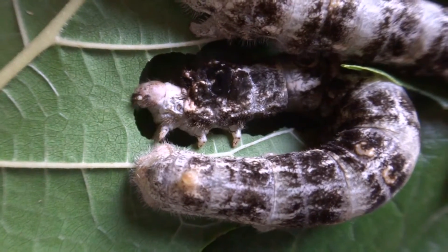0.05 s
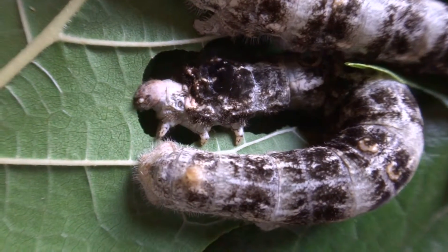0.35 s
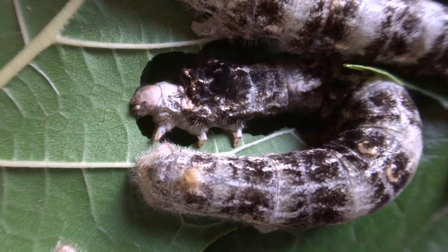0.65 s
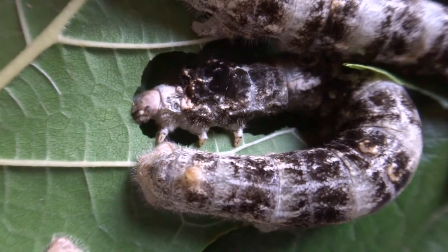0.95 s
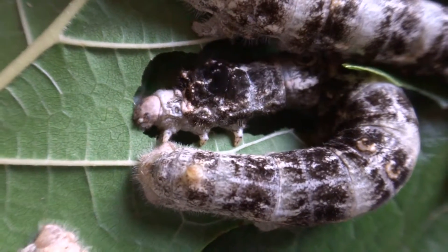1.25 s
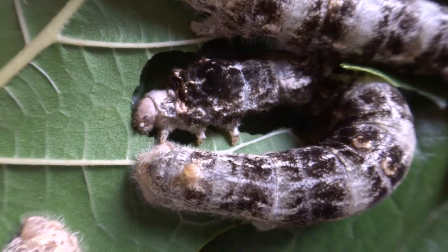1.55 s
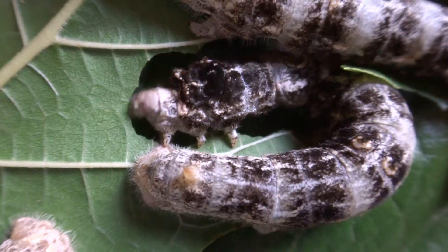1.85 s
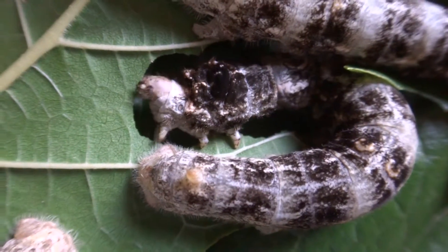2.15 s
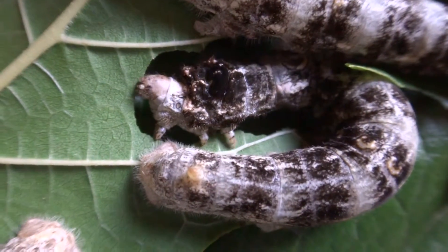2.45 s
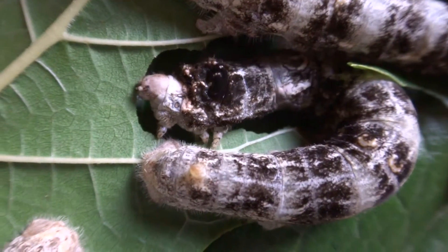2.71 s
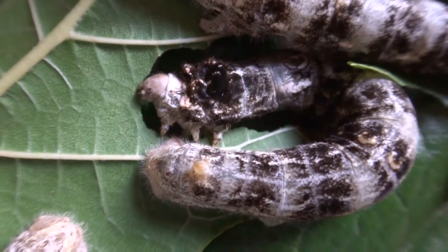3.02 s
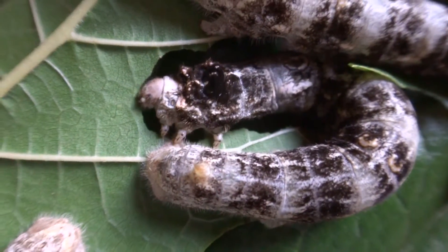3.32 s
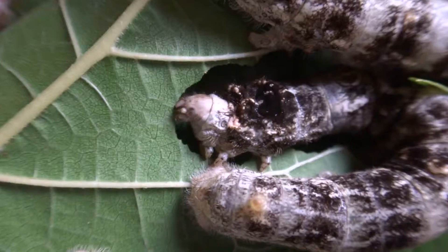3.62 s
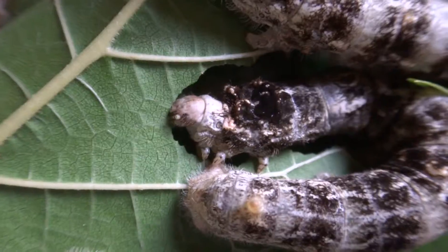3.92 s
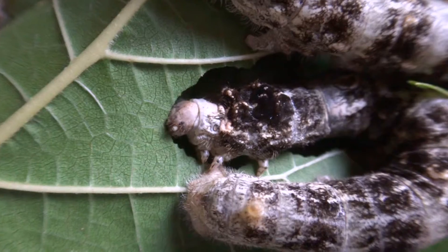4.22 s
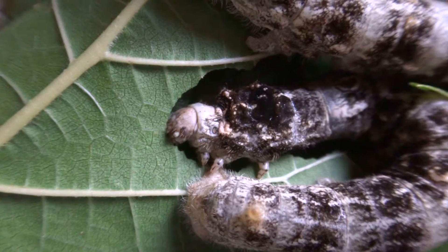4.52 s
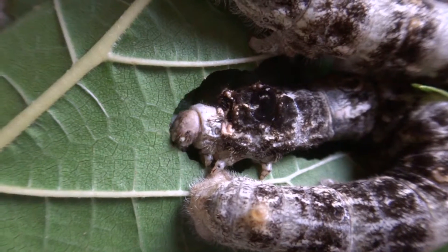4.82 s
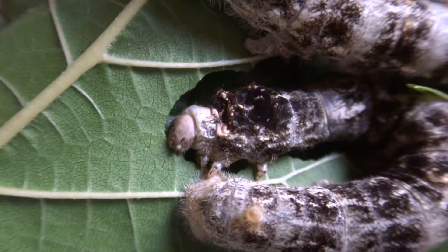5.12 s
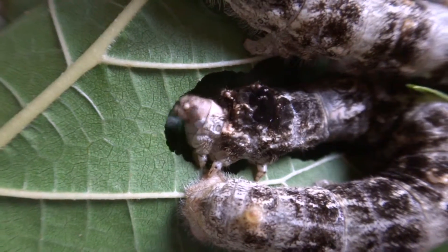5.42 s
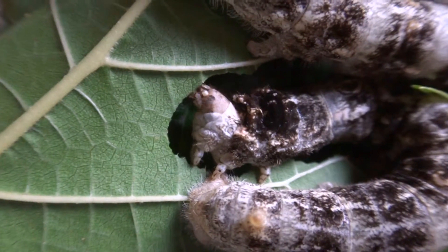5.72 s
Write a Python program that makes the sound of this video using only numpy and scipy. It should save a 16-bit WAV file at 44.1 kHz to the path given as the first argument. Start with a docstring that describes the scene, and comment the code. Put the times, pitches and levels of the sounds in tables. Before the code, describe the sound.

Many silkworms feed on leaves in a quiet room. Right at the microphone their jaws snap through the leaf in sharp, high, irregular ticks, several a second, with an occasional tiny rasping tear. Farther ones blend into a fine crackle. Underneath lie a low room rumble, faint fan hum and a thin camera whirr. A few very soft bumps come around the middle, then the background briefly drops out.

```python
"""A fine crackle comes first: many silkworms feeding on a tray of leaves in a quiet room.
Right at the camera's microphone, mandibles snap through the blade in sharp little ticks and now and then
saw through a row of fibres. Behind them lie room rumble, two beating fans and the camera's own whirr;
its lens motor makes one short run of steps. The tray is bumped softly a few times,
and the steady background dips briefly once."""
import sys
import numpy as np
from scipy import signal
from scipy.fft import rfft, irfft, next_fast_len
from scipy.io import wavfile
from scipy.ndimage import map_coordinates

SR = 44100
rng = np.random.default_rng(int(sys.argv[2]) if len(sys.argv) > 2 else 0)


def unload_wav(signal):
    """Save mono or channel-first audio to the path in sys.argv[1] as 16-bit WAV at rate SR, clipped to [-1, 1]."""
    wavfile.write(
        sys.argv[1],
        SR,
        np.round(np.clip(np.atleast_2d(signal).T, -1, 1) * 32767).astype(np.int16),
    )


N = 258426


def amp(db):
    return 10 ** (np.asarray(db) / 20)


def unit(x):
    """Scaled to rms 1."""
    return x / np.sqrt(np.mean(x ** 2) + 1e-20)


def along(points, hz):
    """(f/Hz, value) points joined on a log axis."""
    f, v = np.transpose(points)
    return np.interp(np.log(hz + 1), np.log(f + 1), v)


def curve(rows):
    """(t/s, value) rows as one value per sample."""
    return np.interp(np.arange(N) / SR, *np.transpose(rows))


def wobble(rate):
    """A smooth random curve, rate knots a second."""
    knots = rng.standard_normal(int(N * rate / SR) + 4)
    return map_coordinates(knots, [np.arange(N) * rate / SR])


def filtered(x, response):
    """x shaped by a frequency response."""
    size = next_fast_len(N + SR // 4)
    return irfft(rfft(x, size) * response(np.fft.rfftfreq(size, 1 / SR)), size)[..., :N]


def causal(gain):
    """The response with this gain that rings only after its cause."""
    cepstrum = irfft(np.log(np.maximum(gain, 1e-6)))
    half = len(cepstrum) // 2
    cepstrum[1:half] *= 2
    cepstrum[half + 1:] = 0
    return np.exp(rfft(cepstrum))


def bell(hz, centre, width):
    """A rounded peak of height 1."""
    return np.exp(-2 * ((hz - centre) / width) ** 2)


def octave_bell(hz, centre, octaves):
    """The same peak on an octave axis."""
    return bell(np.log2(hz + 1), np.log2(centre), octaves)


def band_gain(bands, hz):
    """The gain of (f/Hz, width/Hz, gain/dB) lifts and cuts."""
    return amp(sum(db * bell(hz, centre, width) for centre, width, db in bands))


def pan(db):
    """Stereo gains, left louder than right by db."""
    return amp(np.array([[db], [-db]]) / 2)


def stereo(mid, side):
    return np.array([mid + side, mid - side])


def stereo_noise(side_db):
    """White noise, its side signal side_db against its mid."""
    mid, side = rng.standard_normal((2, N))
    return unit(stereo(mid, amp(side_db) * side))


def add(out, s, sound):
    """Mixes a sound in at time s."""
    start = max(0, round(s * SR))
    span = out[:, start:start + sound.shape[-1]]
    span += sound[..., :span.shape[-1]]


def crackle(rate, spread_db, clump_db, t60, size=400):
    """Tiny fractures: decaying noise grains of random strength, clumping around a base rate a second."""
    chance, strength = rng.random(N), np.minimum(rng.exponential(1, N), 3)
    starts = chance < rate / SR * amp(clump_db * wobble(25))
    impulses = starts * amp(spread_db * strength)
    decay = amp(-60 * np.arange(size) / SR / t60)
    power = signal.fftconvolve(impulses ** 2, decay ** 2)[:N]
    return unit(np.sqrt(np.abs(power)) * stereo_noise(side_db=-9))


# Colour of the chewing farther back on the tray: f/Hz, relative level/dB
CROWD_COLOUR = [(1200, -38), (2500, -20), (3400, -2), (4500, -3.5), (6000, 0.5), (8000, 1), (9500, -0.5),
                (11500, -6), (15000, -17)]
# How busily that crowd feeds: t/s, level/dB before the background gain
CROWD_ACTIVITY = [(0.0, -51.5), (0.9, -50.5), (1.16, -51.5), (1.48, -48.5), (2.06, -48.5), (2.43, -54.5),
                  (2.84, -51), (3.25, -51), (3.61, -49), (4.29, -47.5), (4.85, -47), (5.29, -50),
                  (5.86, -46)]
def crowd(crackle_db=-3, hiss_db=-7, patch_db=7, waver_db=1.2, patches=5):
    """Farther mouths, each group on a patch of leaf with its own ring; the farthest blur into hiss."""
    grains = np.zeros((2, N))
    for ring_hz in np.geomspace(3600, 9500, patches):
        colour_db = lambda hz: along(CROWD_COLOUR, hz) + patch_db * bell(hz, ring_hz, 0.31 * ring_hz)
        chewing = crackle(rate=89, spread_db=5, clump_db=4, t60=0.0084)
        grains += filtered(chewing, lambda hz: causal(amp(colour_db(hz))))
    hiss = filtered(stereo_noise(side_db=-14.5), lambda hz: amp(along(CROWD_COLOUR, hz)))
    activity = amp(curve(CROWD_ACTIVITY) + waver_db * wobble(14))
    return activity * (amp(crackle_db) * unit(grains) + amp(hiss_db) * unit(hiss)) * pan(-1)


# Room tone at the microphone: f/Hz, relative level/dB
ROOM_COLOUR = [(20, 0.5), (60, -1), (85, -0.5), (140, -0.5), (250, -5), (500, -8), (1000, -13.5),
               (1700, -15), (4000, -18.5), (9000, -12), (15000, -10.5)]
# How alike it is in the two channels: f/Hz, correlation
ROOM_LIKENESS = [(40, 1), (130, 0.69), (300, 0.021), (1000, 0.022), (3000, 0.1), (12000, 1)]
def room_tone(level_db=-54.5):
    """Low room rumble and microphone hiss, wide in the midrange and centred at both ends."""
    def mid_side_gains(hz):
        angle = np.arccos(np.clip(along(ROOM_LIKENESS, hz), -1, 1)) / 2
        return amp(along(ROOM_COLOUR, hz)) * [np.cos(angle), np.sin(angle)]
    mid, side = filtered(rng.standard_normal((2, N)), mid_side_gains)
    return amp(level_db) * unit(stereo(mid, side))


# Resonances of the camera case, right beside the microphone:
# f/Hz, width/Hz, level/dB before the background gain, left over right/dB
CASE_RESONANCES = [(720, 148, -67, 56), (1275, 110, -63, 3.5), (2260, 320, -65, 4), (2904, 174, -57, 0.5),
                   (3198, 310, -59, -1.5), (5870, 810, -59.5, -2.5)]
def camera_whirr():
    """Motor noise rings in narrow resonances of the case, nearer one microphone port or the other."""
    out = np.zeros((2, N))
    for centre, width, db, balance_db in CASE_RESONANCES:
        resonance = lambda hz: 1 / (1 + (1.38 * (hz - centre) / width) ** 2)
        band = filtered(stereo_noise(side_db=-6), resonance)
        out += amp(db) * unit(band * pan(balance_db))
    return out


def fan_hum(fan_hz=(111.1, 113.68), fan_db=(-72, -68), swell_s=(1.32, 4.22), mains_hz=100, mains_db=-73):
    """Back in the room, two fans at nearly the same speed beat over a faint mains hum."""
    t = np.arange(N) / SR
    dip_s, _ = min(BACKGROUND_GAIN, key=lambda row: row[1])
    since_swell = t - np.where(t < dip_s, *swell_s)  # in phase at these times, either side of the dip
    fans = sum(amp(db) * unit(np.cos(2 * np.pi * hz * since_swell)) for hz, db in zip(fan_hz, fan_db))
    mains = amp(mains_db) * unit(np.sin(2 * np.pi * mains_hz * t))
    return fans + mains


# Small nibbles near the microphone: mean, spread; rows are level/dB, ring f/Hz, knock/dB, sparkle/dB
NIBBLE_RANGES = [(-34, 2.3), (6700, 900), (-21, 2.5), (-10, 4.4)]
def nibbles(slot_s=0.19):
    """Rows for snap(): one light nibble at a random moment in each slot, ducking with the dip."""
    slots = np.arange(0, N / SR - slot_s, slot_s)
    delays, scatter = rng.random(200), rng.standard_normal((200, 4))
    mean, spread = np.transpose(NIBBLE_RANGES)
    dip_db = curve(BACKGROUND_GAIN) - BACKGROUND_GAIN[0][1]
    rows = []
    for slot, delay, deviation in zip(slots, delays, scatter):
        s = slot + delay * slot_s
        db, *colour = mean + spread * deviation
        rows.append((s, db + dip_db[int(s * SR)], *colour))
    return rows


# Resonances of the leaf closest to the microphone: f/Hz, width/Hz, gain/dB
LEAF_RESONANCES = [(5900, 190, 5.5), (8470, 1300, 5.5), (6900, 500, 1.5), (13700, 970, -4)]
def snap(ring_hz, knock_db, sparkle_db, crack_t60=0.0014, shiver_t60=0.015, gap_s=0.0005, size=1024):
    """A mandible cuts the blade: two fractures a moment apart, then a short shiver of the leaf."""
    t, hz = np.arange(size) / SR, np.fft.rfftfreq(size, 1 / SR)
    since_second = t - gap_s * rng.uniform(0.65, 1.3)
    first = amp(-60 * t / crack_t60)
    second = (since_second > 0) * amp(-1 - 60 * np.abs(since_second) / crack_t60)
    shiver = amp(-11 - 60 * t / shiver_t60)
    envelope = first + second + shiver
    leaf = band_gain(LEAF_RESONANCES, hz)
    broadband = amp(-24) * hz ** 2 / (hz ** 2 + 1500 ** 2)  # so small a source radiates almost no bass
    ring = unit(leaf * octave_bell(hz, ring_hz, octaves=1)) + broadband
    knock = unit(octave_bell(hz, 2250, octaves=0.6))
    sparkle = unit(leaf * bell(hz, 13000, width=5100))
    mid, side = np.zeros((2, size))
    for colour, db in [(ring, 0), (knock, knock_db), (sparkle, sparkle_db)]:
        burst = envelope * rng.standard_normal((2, size))
        part_mid, part_side = irfft(rfft(burst) * causal(colour + amp(-71)))
        mid += amp(db) * unit(part_mid)
        side += amp(db) * unit(part_side)
    tick = stereo(mid, amp(-12) * side)
    return tick * np.sqrt(2 * SR / 1000 / np.sum(tick ** 2))  # the energy of one millisecond at rms 1


# Bites right in front of the microphone:
# t/s, level/dB, ring f/Hz, leaf knock/dB and edge sparkle/dB (both against the ring)
CLOSE_BITES = [(0.2913, -25, 6040, -17, -5), (0.445, -26, 6900, -33, -12.5), (0.7132, -24, 5850, -22, -5),
               (0.8116, -29.5, 6250, -25, -22), (0.8575, -24, 5660, -19, -3), (1.284, -29, 6860, -28, -15),
               (1.429, -28.5, 6300, -16.5, -17), (1.681, -20, 6300, -16, -11), (1.7211, -26, 9100, -31, -2),
               (1.82, -20, 7800, -32, -13), (2.2008, -28.5, 5100, -17, -16),
               (2.2704, -30.5, 6850, -13, -19), (2.3105, -15.5, 6650, -18, -8),
               (2.4727, -26, 6200, -20, -14), (2.4822, -30, 6900, -22, -7), (2.496, -28, 5900, -19, -3),
               (2.6393, -25.5, 7140, -16, -3.5), (2.8937, -26.5, 7000, -21, -9),
               (2.9226, -22, 4050, -17.5, -1.5), (3.021, -30, 7000, -12, 4), (3.24, -23, 6000, -29, -10),
               (3.2638, -24.5, 6230, -20, -12), (3.2717, -30.5, 6700, 11, -10),
               (3.3922, -18, 6130, -19, -19), (3.5842, -35.5, 5800, -8, -23),
               (3.704, -27, 6500, -13.5, -16), (3.9136, -28.5, 7500, -19, -6),
               (4.081, -18.5, 7800, -19, -8), (4.1108, -25, 7400, -17, -3), (4.1937, -21, 7160, -10.5, -2),
               (4.4631, -24.5, 7350, -18, -3), (4.4904, -27, 7000, -25, -10), (4.785, -27, 7060, -21, -15),
               (4.8602, -30.5, 7400, -18, -21), (5.104, -25, 8450, -17, -17), (5.295, -23, 8500, -23, -5),
               (5.538, -26.5, 6540, -22.5, 4), (5.6069, -29.5, 5630, -12, -9),
               (5.7559, -18.5, 5370, -9.5, -10)]
def bites(flank_chance=0.35, flank_s=0.007, flank_db=-11):
    """Close jaws snap among the nibbles; a bite may have a weaker crack just before or after it."""
    flanks = []
    for s, db, *colour in CLOSE_BITES:
        for direction in (-1, 1):
            luck, spacing = rng.random(2)
            if luck < flank_chance:
                flanks.append((s + direction * flank_s * (0.5 + spacing), db + flank_db, *colour))
    out = np.zeros((2, N))
    for s, db, *colour in [*CLOSE_BITES, *flanks, *nibbles()]:
        add(out, s, amp(db) * snap(*colour) * pan(rng.normal(-1, 1)))
    return out


def lens_motor(start_s=0.2745, steps=9, step_hz=60, level_db=-47.5, ring_t60=0.024, tick_t60=0.0066):
    """Beside the microphone, an even run of steps; each ticks at its own strength and rings the barrel."""
    t = np.arange(N) / SR - start_s
    since_step = t % (1 / step_hz)
    running = (t >= 0) * (t < steps / step_hz)
    ringing = stereo_noise(side_db=-6) * running * amp(-60 * since_step / ring_t60)
    barrel = filtered(ringing, lambda hz: causal(bell(hz, 3280, width=850) + amp(-40)))
    blows = running * amp(4 * wobble(step_hz) - 60 * since_step / tick_t60)
    ticks = filtered(stereo_noise(side_db=-10) * blows, lambda hz: octave_bell(hz, 5900, octaves=1.7))
    return amp(level_db) * np.sqrt(running.mean()) * (unit(barrel) + amp(1) * unit(ticks))


# Longer tears at close range: middle t/s, peak level/dB
CLOSE_TEARS = [(.831, -37), (1.705, -42), (2.979, -34.5), (3.083, -37.5), (5.708, -32.5)]
def tears(fade_s=0.0056, ring_hz=7100, trail_db=-22):
    """Jaws saw through many fibres in a row; such snaps also trail faintly after each close bite."""
    t = np.arange(N) / SR
    fade = lambda s: np.exp(-np.minimum(np.abs(t - s) / fade_s, 20))
    swells = sum(amp(db) * fade(s) for s, db in CLOSE_TEARS)
    trails = sum(amp(db + trail_db) * fade(s) * (t > s) for s, db, *_ in CLOSE_BITES)
    fibre_snaps = crackle(rate=1500, spread_db=3, clump_db=1, t60=0.004)
    fibres = filtered(fibre_snaps, lambda hz: octave_bell(hz, ring_hz, octaves=1))
    return (swells + trails) * unit(fibres) * pan(-1)


# Soft bumps of the tray, dead centre: t/s, peak level/dB before lift_db
TRAY_BUMPS = [(2.667, -51), (2.764, -52.5), (2.812, -58), (3.064, -59), (3.242, -60), (3.268, -48.5),
              (5.758, -59)]
def tray_bumps(low_hz=115, upper_hz=280, upper_db=-9, t60=0.036, attack_s=0.0042, lift_db=6.5):
    """Two heavily damped modes of the tray give a dull thud."""
    out, t = np.zeros((2, N)), np.arange(SR // 5) / SR
    modes = np.sin(2 * np.pi * low_hz * t) + amp(upper_db) * np.sin(2 * np.pi * upper_hz * t)
    thud = modes * amp(-60 * t / t60) * (1 - np.exp(-t / attack_s))
    for s, db in TRAY_BUMPS:
        add(out, s, amp(db + lift_db) * thud / np.max(thud))
    return out


# Gain on the steady sounds, raised except around one brief dip: t/s, gain/dB
BACKGROUND_GAIN = [(3.495, 4), (3.515, -5.5), (3.53, -40), (3.539, -36), (3.55, -9.5), (3.58, -2.5),
                   (3.65, 0.5), (3.76, 3.5)]
def scene():
    """The steady sounds dip together; lens steps, bites, tears and bumps stand out in front."""
    background = crowd() + camera_whirr() + room_tone() + fan_hum()
    return amp(curve(BACKGROUND_GAIN)) * background + lens_motor() + bites() + tears() + tray_bumps()


# Treble bands that cancel in the microphone's sound path: f/Hz, width/Hz, gain/dB
PORT_NOTCHES = [(4407, 256, -4.5), (8730, 610, -6), (10400, 1050, -4.5), (12650, 1330, -8),
                (14300, 1100, -0.5), (15400, 1300, -4)]
TOP_HZ = 15900
def record(dry):
    """The microphone colours the treble; the camera keeps nothing above its band limit."""
    coloured = filtered(dry, lambda hz: causal(band_gain(PORT_NOTCHES, hz)))
    return filtered(coloured, lambda hz: hz < TOP_HZ)


dry = scene()
out = record(dry)
unload_wav(out)
```